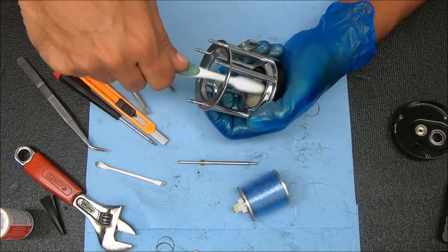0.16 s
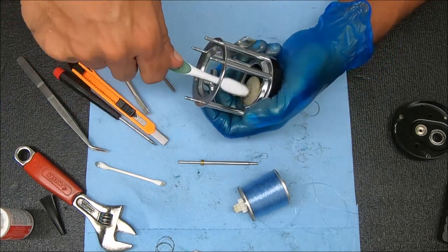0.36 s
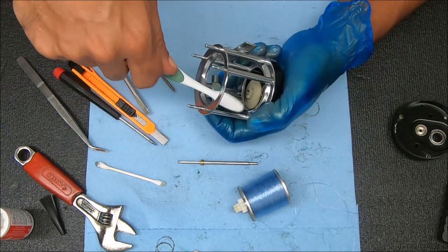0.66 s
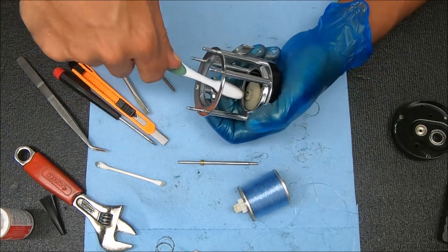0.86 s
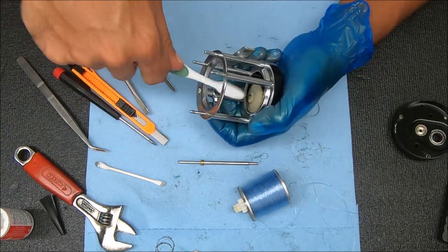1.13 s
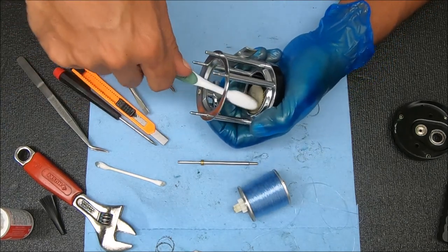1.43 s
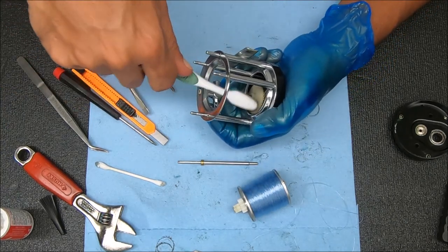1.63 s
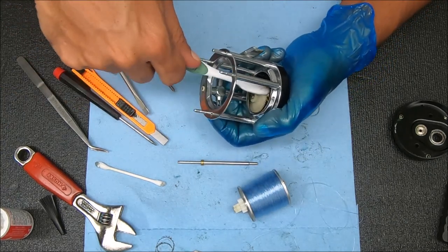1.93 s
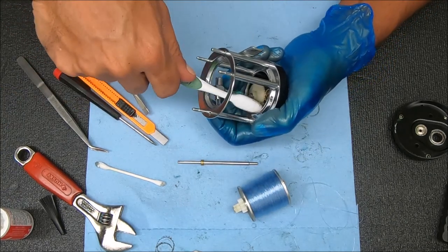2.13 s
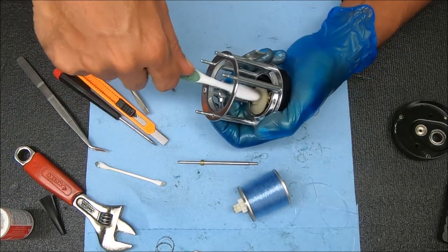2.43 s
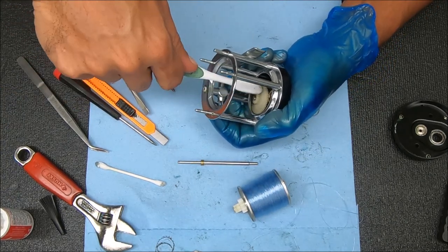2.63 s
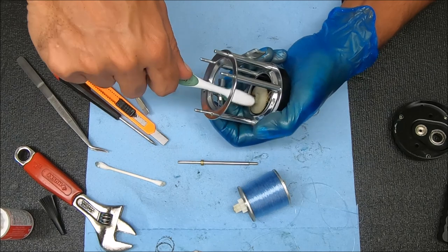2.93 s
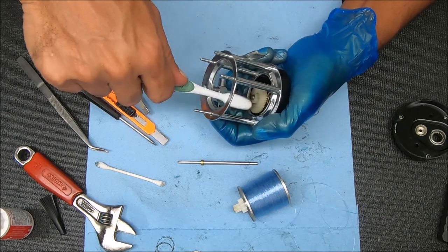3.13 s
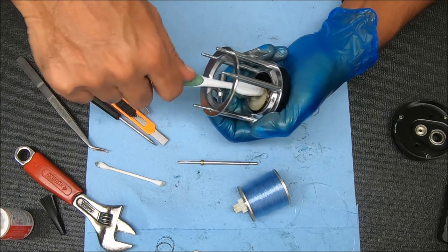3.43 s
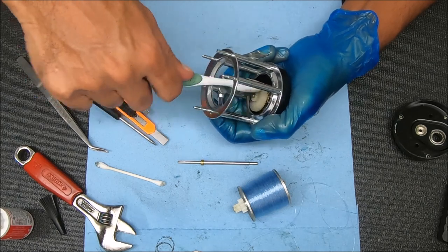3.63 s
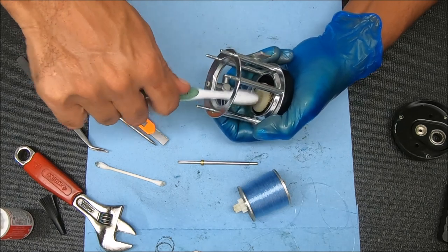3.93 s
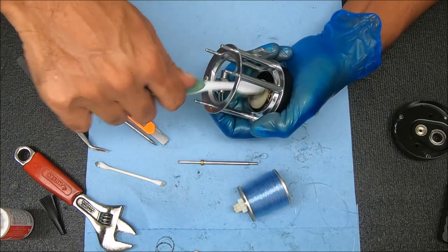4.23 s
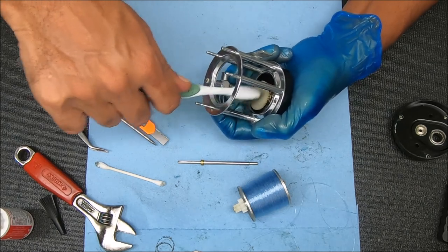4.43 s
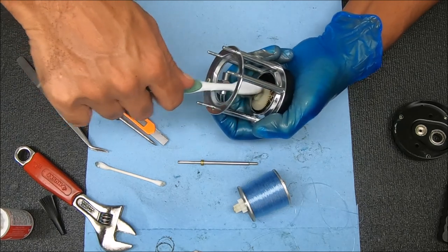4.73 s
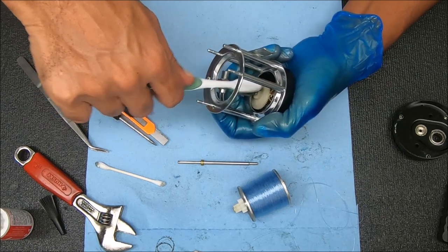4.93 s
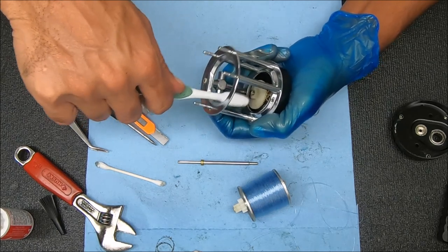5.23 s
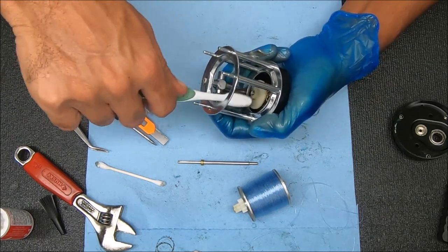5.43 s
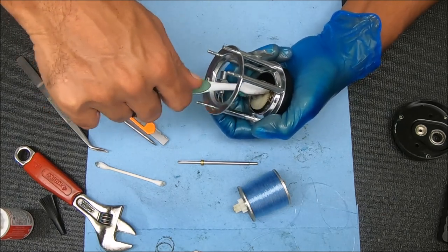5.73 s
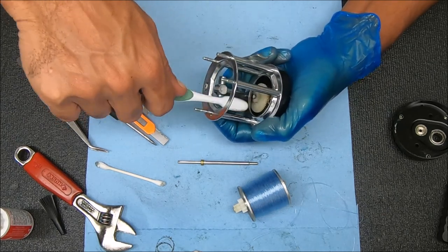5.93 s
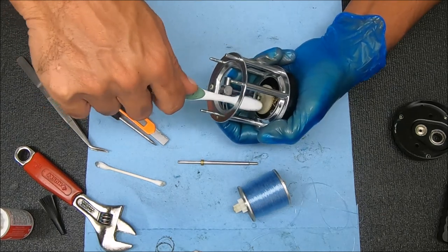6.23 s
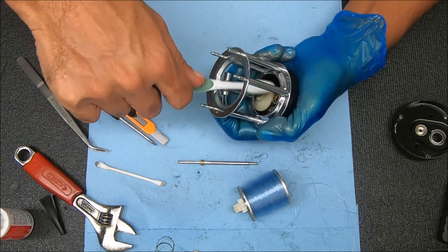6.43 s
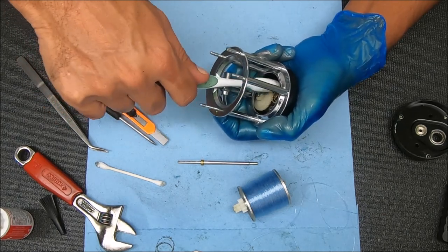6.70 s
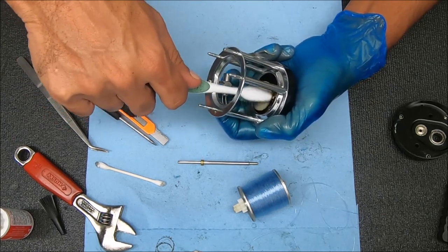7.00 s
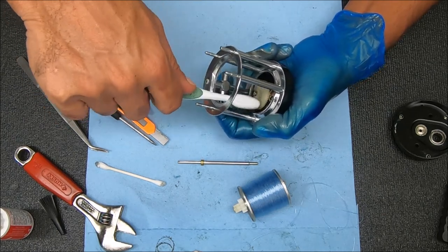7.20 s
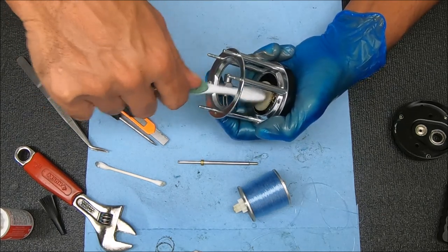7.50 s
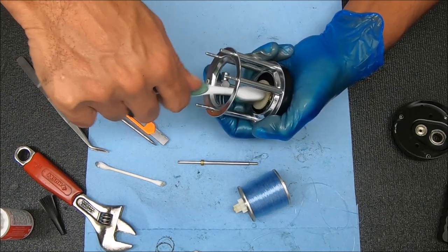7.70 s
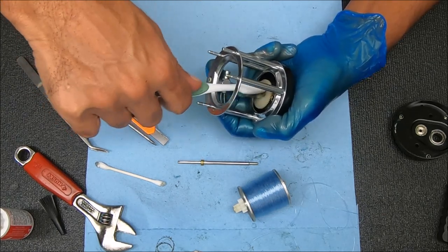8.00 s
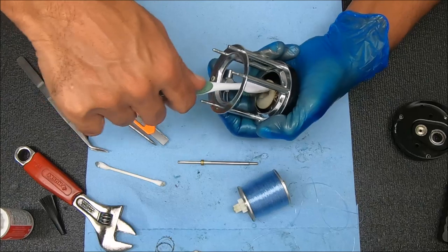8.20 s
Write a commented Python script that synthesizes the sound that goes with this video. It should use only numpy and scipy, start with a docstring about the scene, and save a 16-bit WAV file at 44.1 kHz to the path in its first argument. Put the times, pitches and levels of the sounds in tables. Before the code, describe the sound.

A small brush scrubs inside a hand-held metal fishing reel frame, heard close in a small workshop with a short, faint wall reflection. From the start, brief scratchy bristle strokes come about four or five a second, with crisp metal knocks near 0.1 and 0.3 seconds, then lighter ticks. Around 2.2 seconds a bright double click stands out, followed by another near 2.5. From about 3 to 6.2 seconds the scrubbing is steady and brisk, its dry hisses mixed with small tinny clacks; a soft hollow tap falls at 5.6. Between 6.3 and 7.4 the strokes become less even and partly softer. Sharper clicks arrive near 7.5, 7.6 and 7.9, and a stronger scratch begins at the end, about 8.3. All metal sounds are short and damped. Beneath runs a quiet low hum around 120 hertz, uneven deep rumble and faint air.

```python
"""In a small workshop, a toothbrush scrubs inside the wire cage of a hand-held fishing reel.
Bristle flicks hiss stroke by stroke, partly through the cage's modes and partly straight into the air.
Handle and head knock on the metal in clusters of touches that ring the modes; one soft tap rings hollow.
Decaying noise gives the brief answer of the walls; a machine hums in sines and resonant noise at twice the
mains rate and above, over shaped air, a deep uneven rumble and faint noise opposed in the two channels."""
import sys
import numpy as np
from scipy import signal
from scipy.fft import rfft, irfft, next_fast_len
from scipy.io import wavfile
from scipy.ndimage import map_coordinates

SR = 44100
rng = np.random.default_rng(int(sys.argv[2]) if len(sys.argv) > 2 else 0)


def bounce(signal):
    """Save signal as a 16-bit WAV file at the path given by the first command-line argument."""
    frames = np.transpose(np.atleast_2d(signal))
    limited = np.clip(frames, -1, 1)
    pcm = np.round(limited * 32767).astype(np.int16)
    wavfile.write(sys.argv[1], SR, pcm)


N = 368569

# Brush against cage: (time [s], base strike level [dB], cup strike level [dB], wire strike level [dB],
# wire tilt [dB per octave], pitch of the struck wire [Hz])
KNOCKS = [(0.0987, -45, -24.5, -26.5, -6, 3100.0), (0.3133, -34.5, -24.5, -21, -1, 4640),
          (0.3456, -49.0, -39, -40, 4, 6000.0), (0.5561, -55, -48, -48, -6, 6000.0),
          (0.604, -41, -44, -39.5, -10, 4600.0), (0.623, -52, -46, -37.5, -14, 3860),
          (0.855, -67.0, -44.0, -58.0, -2, 11800.0), (0.8677, -64, -43, -40, -4, 5940),
          (0.938, -59, -57.0, -41.5, 2, 9500.0), (0.9742, -70, -58, -45, 1, 8700.0),
          (1.1894, -58.0, -46, -42, 6, 9000.0), (1.1973, -70, -44, -40.5, 5, 8900.0),
          (1.3718, -61.0, -46, -52, -2, 5100.0), (1.4293, -64.0, -45, -44, 6, 12500.0),
          (1.7986, -68.0, -55, -54, 2, 5900.0), (2.1624, -47, -34.5, -33.5, -2, 5600.0),
          (2.1784, -51, -34.5, -18, -5.5, 5900.0), (2.4465, -48, -35, -44.5, -12, 4130),
          (2.5172, -47.0, -44, -40, 2, 5600.0), (2.5216, -43.5, -39, -26.0, -1, 5700),
          (2.6914, -68.0, -42.5, -42, -5, 5970), (2.791, -47, -41.5, -44, -3, 4100.0),
          (2.868, -59, -47, -42.0, -7, 5940), (2.9089, -54.0, -45.5, -38, -7, 6000.0),
          (2.9332, -41, -37, -30.5, 0.5, 11600), (2.976, -57, -58, -40.0, -2, 5730),
          (3.108, -57, -36, -35.5, -6, 5840), (3.1263, -58.0, -43, -44, 1, 9400.0),
          (3.17, -68.0, -52, -46, 0, 5400.0), (3.3308, -41, -33.5, -29, -11.5, 8900),
          (3.36, -63, -44, -35, 3, 11700), (3.403, -52, -42, -37, -9, 4070),
          (3.5343, -56, -45.5, -42.5, -6, 5500.0), (3.587, -50.0, -43.5, -39.5, -4, 8900.0),
          (3.809, -46, -45.5, -39.0, -4, 5700), (3.9662, -48, -40.5, -35, -3, 4870),
          (4.144, -65.0, -39.5, -37.5, -6, 5430), (4.1727, -46, -42, -42.5, -5, 3600.0),
          (4.3596, -64, -44.0, -36, -4, 5300), (4.3837, -39, -34.5, -24.5, -3.5, 8740),
          (4.5989, -46, -43, -37.5, -6, 3100.0), (4.643, -52, -45, -43, 9, 5700.0),
          (4.777, -49, -37, -34.0, -5, 6000.0), (4.799, -43, -43.0, -38, -6, 5600.0),
          (5.008, -45.0, -41, -31, -4, 5500), (5.224, -48, -41, -36.5, -6.5, 8600),
          (5.4102, -57, -40.5, -31.5, -8, 5800.0), (5.4729, -48, -39.5, -39.5, 3, 5700.0),
          (5.6105, -47, -43.0, -41, -8, 3600.0), (5.6203, -45, -40.5, -30, -12, 5800.0),
          (5.667, -61.0, -52.0, -40, 6, 11400.0), (5.701, -50, -41.5, -35.5, -9, 7700.0),
          (5.802, -51.0, -36.5, -33.0, -2, 5400), (5.8692, -58, -49, -35.5, -2, 9300.0),
          (5.8739, -40.5, -38, -26, 1, 6000.0), (5.9676, -68.0, -48, -43, 0, 5930),
          (6.0304, -39.5, -37, -30.0, -7.5, 5800.0), (6.1506, -68.0, -49, -45, -8, 5900.0),
          (6.1719, -57.0, -43.5, -32, 1.5, 9200), (6.2874, -71, -56, -46.5, 6, 12000.0),
          (6.561, -55, -42, -34, -4, 5860), (6.5791, -40, -33.5, -33, -10, 5700.0),
          (6.897, -53, -36.5, -38.5, -5, 3100.0), (7.2635, -49, -37, -38.0, -6, 7150),
          (7.422, -68.0, -46, -43.5, -6, 4200.0), (7.4687, -51.0, -41, -24, 1.5, 9200.0),
          (7.641, -56.0, -28, -34, 2, 6000.0), (7.875, -38.5, -32.5, -18.5, -7, 5800.0),
          (7.8894, -61, -37, -33, 1, 4200.0), (8.0639, -66, -48.5, -48, -6, 3600.0),
          (8.0757, -76, -51, -47.0, 2, 9200.0), (8.144, -61.0, -41.5, -39.5, 5, 11900),
          (8.2797, -58, -29.5, -39.0, -3, 3630)]
# Modes of the cage, damped by a gloved hand: (pitch [Hz], relative level [dB], knocked ring t60 [s])
CAGE = [(626, -4.5, 0.012), (880, -2, 0.012), (1355, -3.5, 0.014), (1844, -1, 0.013), (2135, 2.5, 0.019),
        (2485, -1, 0.018), (2850, 1, 0.018), (3140, -4.5, 0.027), (3620, 10.5, 0.0045), (3900, -6.5, 0.025),
        (4205, -9.5, 0.019), (4590, -12, 0.046), (5240, 2.5, 0.0043), (5746, -1, 0.024), (6070, 1, 0.0064),
        (6940, 0.5, 0.0066), (7870, 2.5, 0.006), (8750, 0.5, 0.017), (9210, 2, 0.016), (9995, 3, 0.0079),
        (11560, 7, 0.0098), (13200, -4, 0.014), (14200, -33, 0.0083)]


def from_db(db):
    """Decibels to gain."""
    return 10 ** (np.asarray(db) / 20)


def rms_one(x):
    """Scale to unit rms."""
    return x / np.sqrt(np.mean(x ** 2) + 1e-20)


def at_hz(points, hz):
    """Read a spectrum in dB on a log-frequency axis."""
    point_hz, point_db = np.transpose(points)
    return np.interp(np.log(hz), np.log(point_hz), point_db)


def coloured(spectrum):
    """White noise filtered to a spectrum, at unit rms."""
    size = next_fast_len(N)
    hz = np.maximum(np.arange(size // 2 + 1), 1) * SR / size
    white = rfft(rng.standard_normal(size))
    return rms_one(irfft(white * from_db(at_hz(spectrum, hz)), size)[:N])


def drift(knots_per_s):
    """Smooth random wander about 0, a cubic spline through random knots."""
    knots = rng.standard_normal(600)
    return map_coordinates(knots, [np.arange(N) / SR * knots_per_s + 5], order=3)


def ring(excitation, hz, t60):
    """A decaying two-pole mode; a unit click rings it to about height 1, and it passes little far below pitch."""
    radius = from_db(-60 / (t60 * SR))
    angle = 2 * np.pi * hz / SR
    return signal.lfilter([.5, 0, -.5], [1, -2 * radius * np.cos(angle), radius ** 2], excitation)


def machine():
    """Steady sine hum, plus noise through a few damped housing resonances."""
    # Steady hum: (pitch [Hz], rms level [dB])
    hum = [(119.9, -46.5), (239.9, -59), (359.8, -71.5), (479.7, -74)]
    # Broad humps in the machine noise: (centre [Hz], width [Hz], rms level [dB])
    humps = [(118.2, 7, -60.5), (162.8, 5.3, -62.5), (282, 40, -69), (365.6, 13, -81), (471, 26, -65.5),
             (539, 21, -69), (590, 49, -71), (666, 3.9, -73)]
    t = np.arange(N) / SR
    out = np.zeros(N)
    for hz, db in hum:
        out += np.sqrt(2) * from_db(db) * np.sin(2 * np.pi * (hz * t + rng.random()))
    for hz, width, db in humps:
        # a wider resonance decays faster
        t60 = np.log(1000) / np.pi / width
        out += from_db(db) * rms_one(ring(rng.standard_normal(N), hz, t60))
    return out


def air():
    """Steady shaped room noise; the part below 40 Hz is split off and follows a level curve."""
    # Background air: (frequency [Hz], relative density [dB per Hz])
    air_spectrum = [(2.9, -27), (5.0, 9), (32, 7), (46, -3.5), (75, -14), (124, -5.5), (192, -30.5),
                    (243, -23), (308, -27), (477, -30), (766, -32), (2110, -41), (3060, -44), (9010, -47.5),
                    (16000, -50.5)]
    # Level of the rumble below 40 Hz: (time [s], level [dB])
    rumble = [(0.0, -30), (.6, -38.5), (1.2, -40), (1.65, -35), (2.2, -37.5), (2.55, -33), (2.9, -35.5),
              (3.7, -36.5), (4.4, -38.5), (5.4, -39), (5.7, -38), (6.2, -33), (6.6, -39.5), (7.1, -39),
              (7.4, -37.5), (7.6, -37.5), (8.36, -40.5)]
    noise = coloured(air_spectrum)
    deep = signal.sosfiltfilt(signal.butter(3, 40, fs=SR, output="sos"), noise)
    time_s, level_db = np.transpose(rumble)
    rumble_db = np.interp(np.arange(N) / SR, time_s, level_db)
    # -39 dB is the rms of the air before its deep part is taken out
    return from_db(-39) * (noise - deep) + from_db(rumble_db) * rms_one(deep)


def opposed_noise():
    """Faint shaped noise of opposite polarity in the two channels."""
    # Noise colour: (frequency [Hz], relative density [dB per Hz])
    noise_spectrum = [(35, -48), (60, -12), (698, -5.5), (767, -5), (1040, -15.5), (5330, -7),
                      (14600, -2.5), (16000, -10)]
    return from_db(-82) * coloured(noise_spectrum) * [[1], [-1]]


def wire_colour(hz, tilt_db, struck_hz):
    """How a knock weights the wire modes, in dB: a tilted arch with a peak at the struck wire."""
    arch_hz, bend_db = 5800, 10  # bend in dB per octave squared
    struck_db, struck_octaves = 7, 0.084  # height and width of the peak
    octaves = np.log2(hz / arch_hz)
    near = np.exp(-(np.log2(hz / struck_hz) / struck_octaves) ** 2)
    return tilt_db * octaves - bend_db * octaves ** 2 + struck_db * near


def pressure():
    """Bell-shaped strokes and the rasp after each knock, as gains for cup, rods, bright and treble modes."""
    # Scrubbing strokes: (peak time [s], rise plus fall to 1/e of the power [s], level before colouring [dB],
    # extra weight on the low modes [dB])
    strokes = [(0.003, 0.1, -67, 6.5), (0.097, 0.036, -56.5, 5), (0.333, 0.091, -58, 1.5),
               (0.463, 0.079, -64.5, 0), (0.665, .055, -59, 0.5), (0.937, 0.061, -58, 0.5),
               (1.132, .017, -61, -3), (1.213, 0.047, -56.5, -2), (1.433, 0.049, -59.5, 0),
               (1.634, 0.044, -55, -1.5), (1.828, 0.055, -57.5, -0.5), (2.028, 0.019, -65, -1),
               (2.554, 0.057, -59, -2), (2.8, 0.13, -70.5, 1), (2.974, 0.09, -62.5, 3.5),
               (3.182, .04, -55.5, -0.5), (3.405, 0.056, -57.5, 1), (3.606, 0.05, -55, 0.5),
               (3.742, 0.032, -65.5, -1), (3.816, 0.042, -56, -1.5), (4.008, 0.11, -61, 0.5),
               (4.227, 0.045, -57, -0.5), (4.414, 0.076, -58, 0), (4.652, 0.044, -54.5, 1),
               (4.855, 0.063, -57.5, -0.5), (5.06, 0.072, -57.5, -0.5), (5.261, 0.093, -60, 0.5),
               (5.481, 0.051, -56.5, 1), (5.689, .043, -56, -0.5), (5.875, 0.018, -52, -1),
               (5.965, 0.092, -59, -1), (6.176, 0.025, -66.5, 1), (6.301, .044, -61, 0.5),
               (6.484, .037, -67, -3), (6.573, 0.029, -52, 3), (6.887, 0.1, -64.5, 1),
               (7.18, 0.042, -63.5, 0.5), (7.265, .043, -64, 0.5), (7.426, .07, -68, 0),
               (7.506, 0.054, -60, 3), (7.715, 0.07, -61.5, -0.5), (7.918, 0.088, -57.5, 1),
               (8.144, 0.041, -59, -0.5), (8.357, 0.033, -50, -1)]
    # Stroke colour for cup, rods, bright and treble: (level offset [dB], share of the extra weight [ratio])
    stroke_colour = [(-2, 1.3), (-0.5, 1.43), (-2.5, -0.28), (-5.5, -.5)]
    rise_share = .45
    rasp_delay_s, rasp_fall_s = 0.0084, 0.023
    rasp_cup_db, rasp_wire_db = -25, -28.5  # relative to the knock's strike levels
    bands_hz = np.array([4600, 8300, 12300])  # pitches that stand for rods, bright and treble

    colour_db, share = np.transpose(stroke_colour)
    bells = []
    for s, length, db, weight_db in strokes:
        level_db = db + colour_db + share * weight_db
        bells.append((s, rise_share * length, (1 - rise_share) * length, level_db))
    # pressed bristles rasp on after a knock
    for s, base_db, cup_db, wire_db, tilt_db, struck_hz in KNOCKS:
        wires_db = wire_db + rasp_wire_db + wire_colour(bands_hz, tilt_db, struck_hz)
        level_db = np.r_[cup_db + rasp_cup_db, wires_db]
        bells.append((s + rasp_delay_s, rasp_delay_s, rasp_fall_s, level_db))

    t = np.arange(N) / SR
    power = np.zeros((4, N))
    for s, rise, fall, db in bells:
        near = slice(max(round((s - .25) * SR), 0), round((s + .25) * SR))
        late = t[near] - s
        bell = np.exp(-(late / np.where(late < 0, rise, fall)) ** 2)
        power[:, near] += bell * from_db(db[:, None]) ** 2
    return np.sqrt(power)


def bristles():
    """Dense flicks of single bristles, partly through the cage modes, partly straight into the air."""
    # How strongly the bristles drive the modes: (frequency [Hz], level [dB])
    drive = [(600, -27), (1400, 1), (2150, 9), (2900, -2), (4200, 3), (5100, -24), (5900, 7.5), (7500, -4),
             (9200, 4.5), (10400, 0), (11900, -7), (14000, -32)]
    flicks_per_s = 3000
    damping = .35  # pressed bristles shorten the metal's ring to this share
    edges_hz = [1400, 3100, 6800, 10100, 15000]  # borders of cup, rods, bright and treble
    direct_share = [0.63, 1.08, 1.1, 0.74]  # airborne snap against ring, per group

    sizes = from_db(2.7 * np.minimum(rng.exponential(1, N), 5)) * rng.choice([-1, 1], N)
    happens = rng.random(N) < flicks_per_s / SR
    flicks = sizes * happens * from_db(3 * drift(60))
    groups = np.zeros((4, N))
    for k, (hz, _, t60) in enumerate(CAGE):
        # the brush wanders over the metal, so each mode comes and goes a little
        wander_db = 3 * drift(7)
        rung = rms_one(ring(flicks, hz, damping * t60))
        polarity = (-1) ** k
        group = np.searchsorted(edges_hz[1:-1], hz)
        groups[group] += polarity * from_db(at_hz(drive, hz) + wander_db) * rung
    out = np.zeros(N)
    for k, (gain, direct) in enumerate(zip(pressure(), direct_share)):
        # the airborne snap of a flick bears no fixed phase to the ring that it starts
        snaps = flicks * rng.choice([-1, 1], N)
        band = signal.butter(2, edges_hz[k:k + 2], "band", fs=SR, output="sos")
        airborne = rms_one(signal.sosfilt(band, snaps))
        out += gain * rms_one(rms_one(groups[k]) + direct * airborne)
    return out


def workshop(x):
    """The walls' answer: exponentially decaying noise that builds up over the first moment."""
    t60_s, echo_db, build_up_s = 0.33, -9.5, 0.0014
    t = np.arange(SR // 2) / SR
    tail = rng.standard_normal(len(t)) * from_db(-60 * t / t60_s)
    tail *= np.clip(t / build_up_s, 0, 1) ** 3
    tail /= np.sqrt(np.sum(tail ** 2))
    return from_db(echo_db) * signal.fftconvolve(x, tail)[:N]


def knocks():
    """Each contact chatters in four quick touches; every touch strikes the modes with its own strengths."""
    # Upper borders of the base modes and the cup modes, wires above: (border [Hz])
    part_border_hz = [1500, 2700]
    longest_gap_s = 0.0008  # between touches
    touch_spread_db = 1.5  # each touch favours other modes
    soft_hz = 3000  # the plastic handle is too soft to click sharply on base and cup

    rows = np.array(KNOCKS)
    hz, level_db, t60 = np.transpose(CAGE)
    gaps = rng.uniform(.2, 1, (len(rows), 4)) * [0, 1, 1, 1]
    touch_s = rows[:, :1] + longest_gap_s * np.cumsum(gaps, axis=1)
    at = np.round(touch_s * SR).astype(int)

    shape = (len(rows), 4, len(CAGE))
    polarity = np.sign(rng.standard_normal(shape))
    spread = from_db(touch_spread_db * rng.standard_normal(shape))
    touch = polarity * spread * [[1], [.45], [.35], [.25]]

    part = np.searchsorted(part_border_hz, hz)  # 0 base, 1 cup, 2 wires
    wires_db = (part == 2) * wire_colour(hz, rows[:, 4:5], rows[:, 5:])
    weight = from_db(level_db + wires_db)
    # the modes of one part share its strike level
    shared = np.sqrt(weight ** 2 @ (part[:, None] == part))
    strength = from_db(rows[:, 1 + part]) * weight / shared

    body, wires = np.zeros(N), np.zeros(N)
    for k in range(len(CAGE)):
        clicks = np.zeros(N)
        np.add.at(clicks, at, strength[:, k, None] * touch[..., k])
        target = wires if part[k] == 2 else body
        target += ring(clicks, hz[k], t60[k])
    return signal.sosfilt(signal.butter(3, soft_hz, fs=SR, output="sos"), body) + wires


def tap():
    """A padded touch: a smeared click rings one low, hollow mode of the cage."""
    # The tap: (time [s], click level before smearing [dB], pitch [Hz], t60 [s])
    hollow_tap = (5.587, -40, 615, .04)
    s, click_db, hz, t60 = hollow_tap
    click = np.zeros(N)
    click[round(s * SR)] = from_db(click_db)
    smeared = signal.lfilter([.08], [1, -.92], click)
    return ring(smeared, hz, t60)


def scene():
    """Brush and cage with their echoes over the room's background."""
    background = machine() + air() + opposed_noise()
    brush = bristles() + knocks() + tap()
    return background + brush + workshop(brush)


def record(dry):
    """A steep elliptic low-pass cuts the top above 15.8 kHz."""
    return signal.sosfilt(signal.ellip(12, .3, 80, 15800, fs=SR, output="sos"), dry)


dry = scene()
out = record(dry)
bounce(out)
```